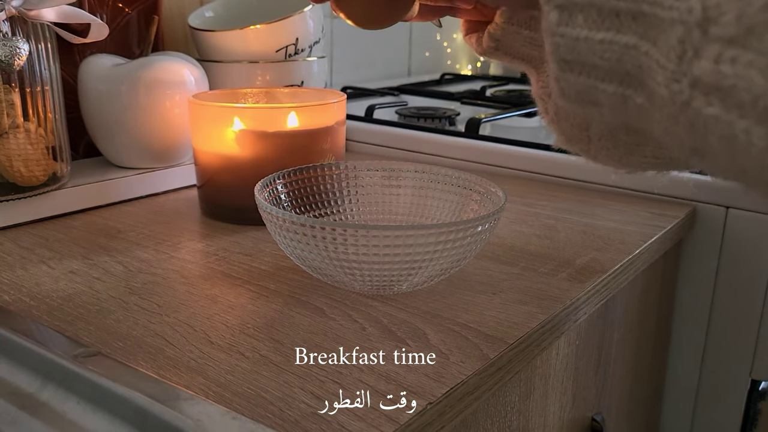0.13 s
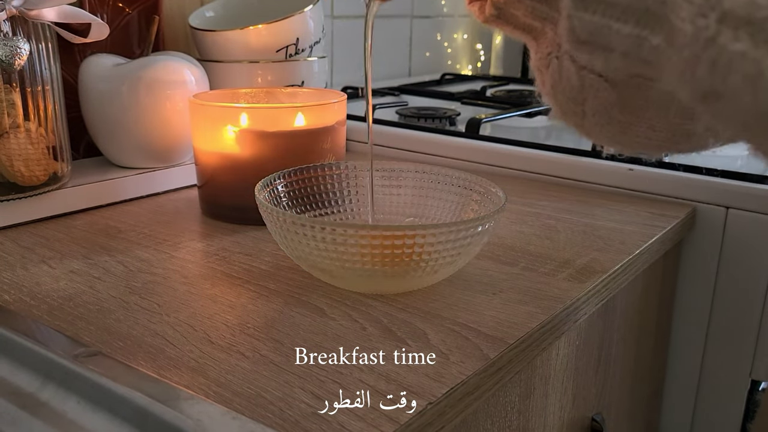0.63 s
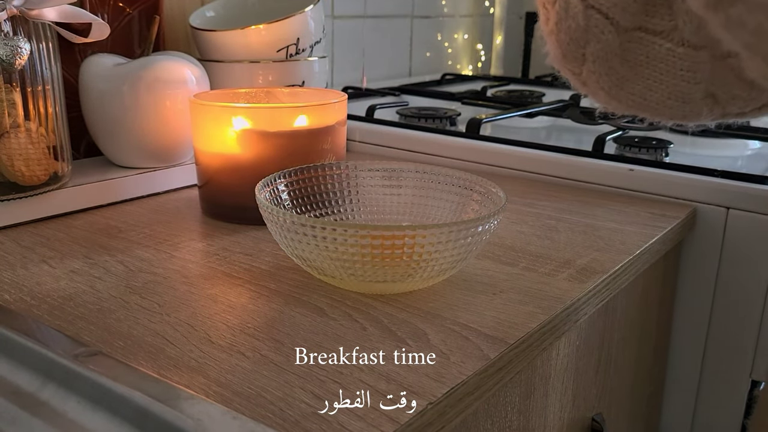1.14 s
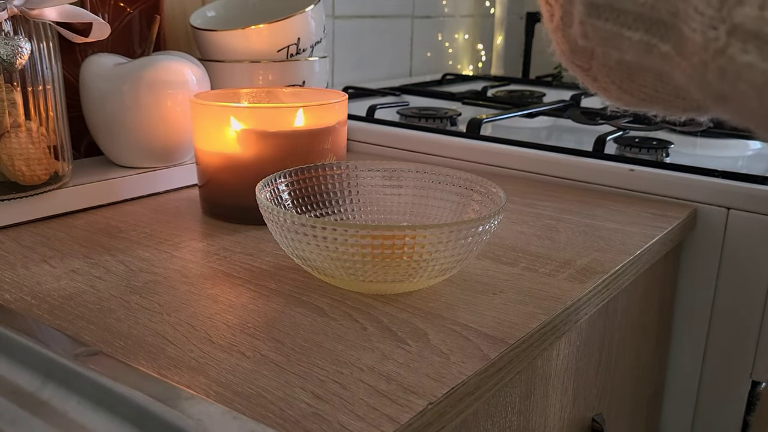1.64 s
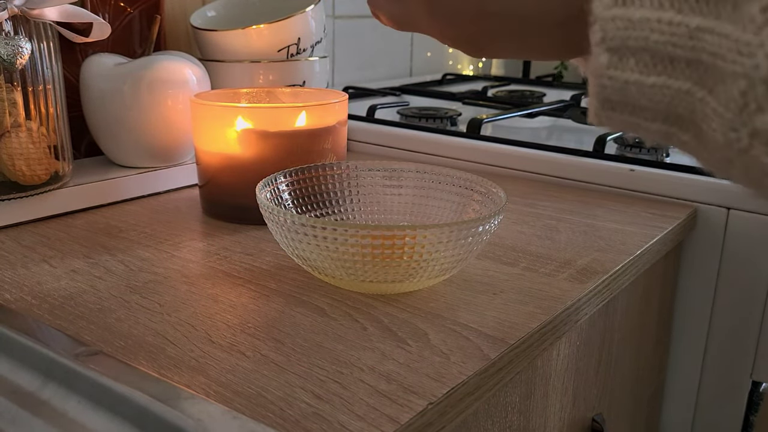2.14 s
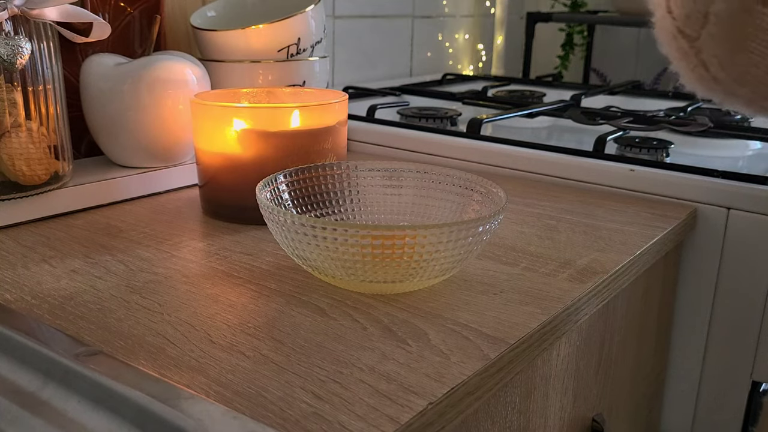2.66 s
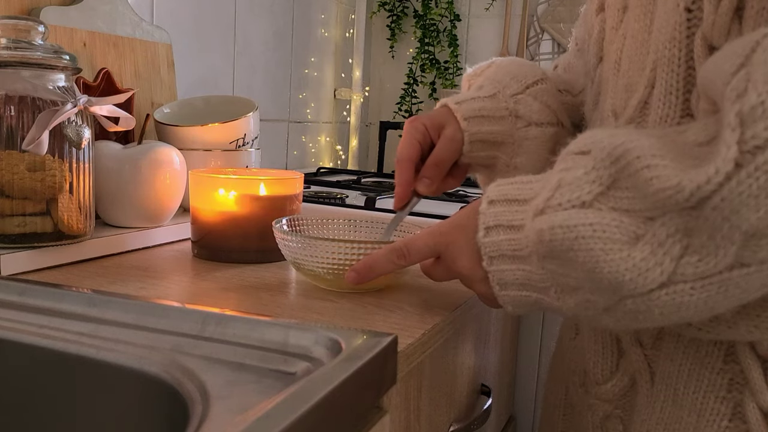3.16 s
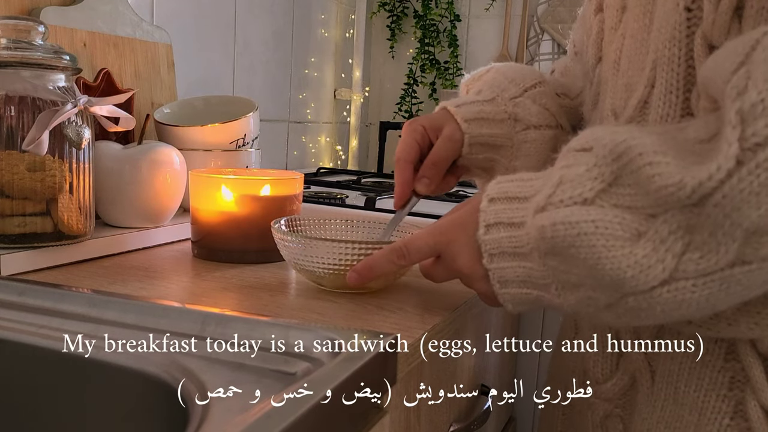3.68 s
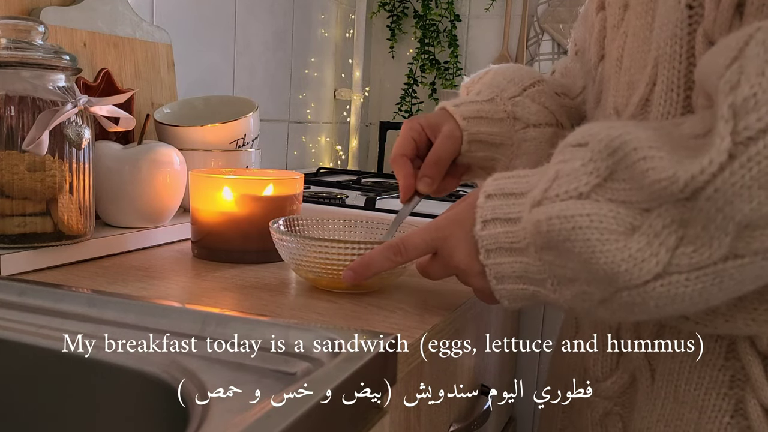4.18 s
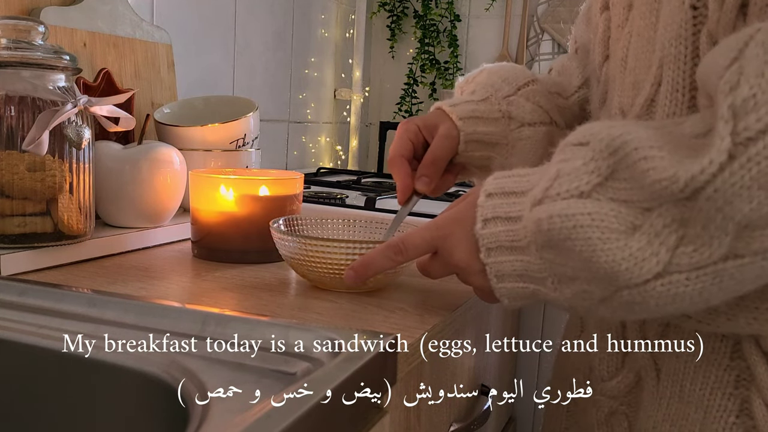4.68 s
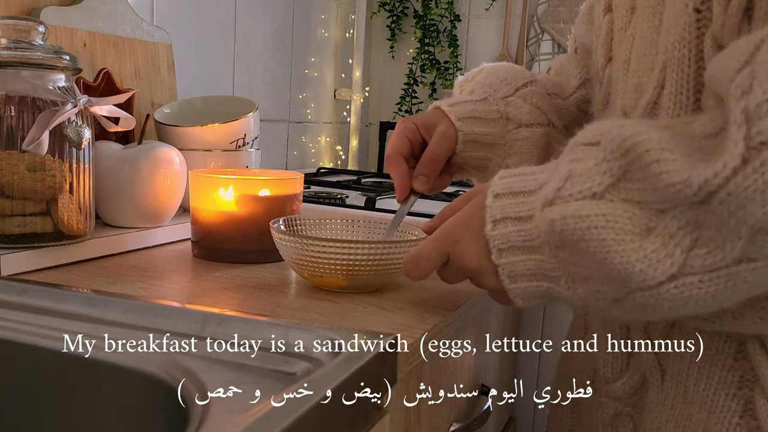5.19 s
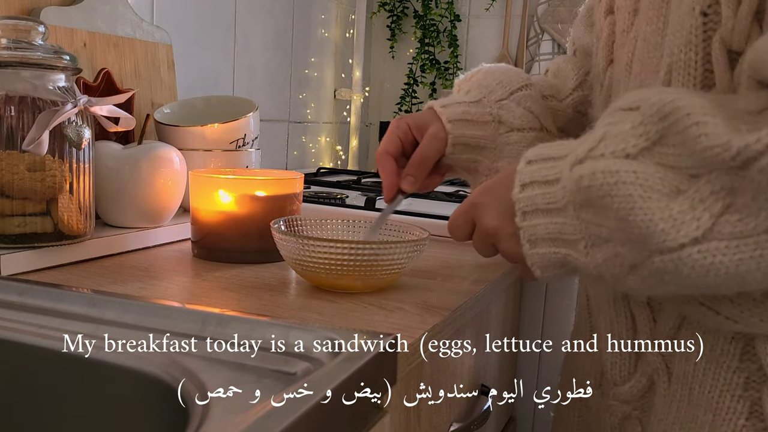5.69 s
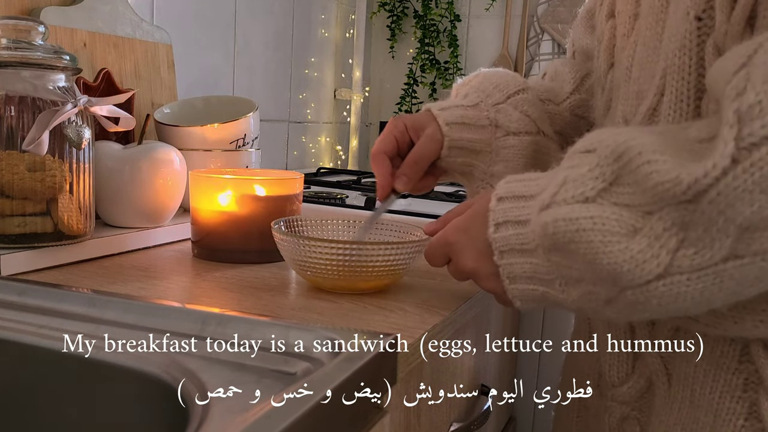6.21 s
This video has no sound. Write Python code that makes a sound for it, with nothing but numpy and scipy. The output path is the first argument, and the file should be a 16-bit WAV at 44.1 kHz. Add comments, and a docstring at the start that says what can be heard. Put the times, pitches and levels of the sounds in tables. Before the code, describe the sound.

An egg cracks and its shell crunches softly in a quiet kitchen, then a fork beats briskly in a glass bowl with bright clinks and thumps.

```python
"""Egg beaten in a glass bowl

A quiet kitchen, close microphones: an egg is cracked over a glass bowl and its shell crunched in the hands
(splinter bursts through resonances), birds far outside (husky pitch glides) over a hush of shaped noise.
Then, louder, a fork beats the egg: tines chatter on the glass (decaying modes and noise snaps), the bowl
thumps the hollow worktop (swings and resonances), the egg slops (band noise), the small tiled room answers."""
import sys
import numpy as np
from scipy import signal
from scipy.fft import rfft, irfft
from scipy.io import wavfile

SR = 44100
rng = np.random.default_rng(int(sys.argv[2]) if len(sys.argv) > 2 else 0)


def ratio(d):
    """dB to gain"""
    e = np.asarray(d, float) / 20
    return 10 ** e


def unload_audio(sound):
    """Save the sound as a 16-bit wav file, at the path given as the first command line argument."""
    columns = np.transpose(np.atleast_2d(sound))
    # keep every value between -1 and 1, then stretch to whole-number steps
    steps = np.round(np.clip(columns, -1, 1) * 32767)
    wavfile.write(sys.argv[1], SR, steps.astype(np.int16))


N = 279153
T = np.arange(N) / SR

# Room tone. Each row: frequency in Hz, relative density in dB per Hz.
HUSH_SPECTRUM = [(15, -38), (25, -6), (63, -1), (134, -18.5), (175, -17), (242, -21.5), (373, -25),
                 (416, -27.5), (818, -30.5), (1610, -38), (4250, -28.5), (6560, -46), (16000, -47.5)]
HUSH_DB = -67
# Far birds. Each row: start in seconds, length in seconds, first pitch in Hz, last pitch in Hz, level in dB.
CHIRPS = [(0.145, 0.042, 3900, 2960, -64), (1.548, 0.04, 4970, 7500, -74), (1.553, 0.065, 4550, 3900, -63),
          (1.705, 0.069, 4440, 4110, -62.5), (1.852, 0.075, 4570, 3900, -60),
          (2.248, 0.075, 4480, 3900, -64), (2.301, 0.042, 3600, 3160, -69.5),
          (2.369, 0.047, 4310, 3660, -73), (2.559, 0.051, 4250, 3670, -81)]
# Decay of the small room. Each row: frequency in Hz, t60 in seconds.
ROOM_T60 = [(100, 0.86), (500, 0.24), (2000, 0.39), (8000, 0.18), (16000, 0.29)]
ROOM_DB, FIRST_ECHO_S = -2.5, 0.0017

# Eggshell cracks, and among them small glass tinks ringing near 8.3 kHz. Each row: start in seconds, level in
# dB, ringing pitch in Hz, t60 in seconds, broad snap in dB over the ringing.
CRACKS = [(.166,-51,3160,0.085,1),(0.297,-33,2527,0.071,-22),(0.2966,-29,2594,0.029,5.5),(0.5052,-44,1800,0.034,9.5),(.513,-42,14500,0.0083,4),
          (0.52,-43.5,1410,0.0089,6),(0.604,-53,8340,0.023,-5),(.6075,-48,3460,0.012,-2.5),(.7264,-68,7450,.015,7),(0.7736,-48,1830,.016,0),
          (.7781,-44.5,3800,0.014,3.5),(1.077,-47,8380,0.027,-34),(1.3354,-57,9360,0.019,-21),(1.3848,-58,2770,0.016,-8),
          (1.4715,-50,1870,.042,-9),(1.6217,-46.5,1910,0.058,-9),(1.6419,-38.5,2017,0.045,-9),(1.75,-63,2090,.015,-3),
          (1.7862,-48,2030,0.05,-4),(1.8328,-40.5,2094,0.06,-9),(1.9824,-61,2100,.015,-2),(2.003,-41.5,1800,0.011,3),
          (2.1188,-48.5,1560,0.017,10.5)]
# Shell halves ground together. Each row: start in seconds, hold in seconds, level in dB, hollow pitch in Hz.
GRINDS = [(1.471,0.035,-74.5,1747),(1.62,0.017,-66,1940),(1.663,0.016,-59,1980),(1.821,0.015,-57.5,2030),
          (1.918,0.019,-64.5,1914),(1.978,0.082,-48.5,1880)]
# Resonances of grinding shell. Each row: centre in Hz, width in Hz, relative level in dB.
SHELL_BODY = [(3100, 1100, -3.5), (5580, 250, -11.5), (7700, 1200, -19), (1170, 440, -19.5)]
GRIND_RISE_S, GRIND_FALL_DB_S, SAG_HZ_PER_S, CRISP_DB = 0.0041, 363, 1000, -8
SHELL_LEFT_DB = 0.5  # left minus right

# Strokes through the egg. Each row: start in seconds, egg level in dB, tine drag level in dB,
# strength of the cupboard rattle in dB.
STROKES = [(2.883,-49.5,-55,-37),(2.93,-49,-69,-41),(3.031,-61,-48.5,-41),(3.21,-59.5,-74,-43),(3.37,-51.5,-55,-37.5),
           (3.541,-55,-62,-38.5),(3.717,-54.5,-78,-37),(3.871,-51,-57,-36.5),(4.038,-54,-58,-38),(4.204,-51,-48.5,-40.5),
           (4.366,-51,-60,-39),(4.522,-47,-48,-38.5),(4.703,-51.5,-52.5,-43),(4.866,-60,-68,-40),(5.04,-57,-58,-38.5),
           (5.24,-60,-59,-45.5),(5.398,-42,-53.5,-36.5),(5.575,-49,-58,-38.5),(5.76,-49,-56,-37),(5.928,-51.5,-52,-41.5),
           (6.125,-50,-57,-39.5),(6.282,-64,-52,-38.5)]
EGG_RISE_S, EGG_FALL_DB_S = 0.03, 232
DRAG_RISE_S, DRAG_FALL_DB_S = 0.019, 330

# Bowl pressed on the worktop. Each row: start in seconds, swing level in dB, rocking rate in Hz,
# length in seconds, deep board mode in dB over the swing.
THUMPS = [(0.583,-40.5,62.3,0.035,-31),(0.64,-50.5,61,0.083,-11),(2.884,-35,80.3,.056,-1),(2.917,-29,95.7,0.066,-24),(3.028,-29,86,0.074,-6),
          (3.215,-31.5,90,0.056,-0.5),(3.372,-25,89,0.051,-2.5),(3.541,-26,83.5,0.048,-23),(3.718,-28,88.3,.044,-22),
          (3.871,-26,85,0.067,-2.5),(4.04,-25.5,83.4,0.056,-17),(4.101,-41,91,0.08,-18),(4.206,-25,93,.057,-12),
          (4.284,-33,83.4,0.06,-20),(4.363,-27.5,97.5,0.075,-7),(4.43,-37,95,0.052,-0.5),(4.523,-24.5,85.8,0.082,-7),
          (4.614,-35,85.7,0.041,-35),(4.712,-24.5,87,0.044,-35),(4.774,-36,90,0.038,-25),(4.866,-26.5,89.9,0.063,-6),
          (4.932,-38,76,0.02,-18),(5.042,-26.5,86.2,0.066,-4.5),(5.198,-33.5,90,0.041,-9),(5.237,-37,87,0.063,-10),
          (5.389,-29.5,91,0.06,-9),(5.565,-36,83.4,0.052,-16),(5.628,-30,88.6,.048,-4),(5.761,-33.5,89,0.069,-2.5),
          (5.926,-28.5,85,0.08,-4.5),(6.132,-33,70.4,0.026,-4),(6.289,-24,87.2,0.14,2)]
BOARD_HZ, BOARD_T60_S, DEEP_HZ = 81.23, 0.88, 71.8
# Cupboard under the worktop. Each row: mode in Hz, gain in dB, t60 in seconds.
CUPBOARD = [(208, -7, 0.16), (263.2, -3, 0.26), (351.8, 12, 0.048), (404.4, 7.5, 0.097), (437, -19, 0.092),
            (489, -35, 0.47), (623, -74, 0.082)]

# Fork on glass. Each row: start in seconds, level in dB, then in dB how hard the rim, ping and
# upper families of modes are struck.
CLINKS = [(2.8822,-29.5,-4.5,-10,-4),(3.0274,-22.5,-12,-5,-5),(3.2068,-24.5,-13,0,-2),(3.3673,-18.5,-9,7,-1),
          (3.5415,-20.5,-8.5,-4,-6),(3.692,-52,-10,9,-20),(3.715,-22,-7,-7,-6.5),(3.8702,-20,-7,-1.5,-6),
          (4.0357,-22.5,-2.5,-3,0),(4.203,-24,-5.5,-5.5,-3.5),(4.3641,-20.5,-9,-6,1.5),(4.5227,-20,-8.5,-1.5,-1.5),
          (4.6972,-30.5,-6,-0.5,-11),(4.7178,-32,-14,-12,-1.5),(4.8507,-40.5,6,4,-2),(4.8667,-20,-1.5,-19,-2),
          (4.8962,-40,-28,-8,-18),(5.037,-22,-9,4,-3.5),(5.157,-51,-1,-13,-8),(5.2424,-42.5,5.5,-16,-4),(5.3764,-50,18,11,-15),
          (5.398,-21.5,-4,2,2.5),(5.5487,-45.5,4,4,-21),(5.5752,-22,-6.5,-8,-0.5),(5.7575,-25.5,-13,-3.5,-2),
          (5.9256,-22,-14,-10,3.5),(6.1,-46.5,16,-15,-12),(6.1164,-26,-10.5,-8,-4),(6.2698,-42,11,3,2),(6.284,-23,-17.5,-2.5,-11)]
# Bounds in Hz of the ten families of bowl modes, low to high.
FAMILY_EDGES = (1250, 1750, 2650, 3100, 3500, 4500, 5300, 7200, 9100, 11700, 15900)
# Held bowl and fork. Each row: mode in Hz, relative level in dB, t60 in seconds.
BOWL = [(1409, -1, 0.019), (1502, -12, 0.067), (1635, -2.5, 0.012), (2150, -17, 0.11), (2330, -11.5, 0.046),
        (3135, 1, 0.0055), (3272, -12.5, 0.04), (3320, -44, 0.078), (3900, 9.5, 0.005), (4952, 10.5, 0.017),
        (4944, 8, 0.0075), (5460, -28, 0.011), (5850, 20.5, 0.0045), (6530, 13.5, 0.011), (6870, 2, 0.014),
        (7867, 5, 0.013), (8160, 19, 0.0046), (8310, 22.5, 0.0037), (7996, 10, 0.012), (9410, -1.5, 0.012),
        (13500, -14, 0.0067), (13480, 9.5, 0.016), (14300, -36, 0.013), (15400, -41, 0.0064)]
BOWL_LOW_HZ = 1200
SOFT_DB, DULL_DB_PER_DB = -38, 0.5  # blows softer than this lose their top
WALL_DB, HIGH_DB, TOP_DB = -4, -2.5, -4  # families given the same base strength in every blow
# Lowest modes once the hand lets go of the rim. Each row: mode in Hz, gain in dB, t60 in seconds.
FREE_BOWL = [(906, -43.5, 0.96), (2193, -37.5, 0.64)]
LET_GO_S = 5.22

# Balance of the microphone pair. Each row: frequency in Hz, left minus right in dB.
LEFT_BALANCE = [(60, 3.0), (110, 3.0), (200, 1.0), (380, 1.0), (700, 2.0), (1290, 4.0), (2380, 4.0),
                (4400, 1.5), (8120, 1.0), (15000, 1.0)]
LEFT_LEAD_S, LEAD_TOP_HZ = 5e-5, 5000  # above this the phase gap between the ports stops growing
MIC_LOW_HZ = 57.3


def across(table, hz):
    """Read (Hz, value) points on a log-frequency axis."""
    f, v = np.transpose(table)
    return np.interp(np.log(np.maximum(hz, 1)), np.log(f), v)


def ring(x, hz, t60):
    """One mode as a complex one-pole resonator: a unit tap rings with unit amplitude."""
    pole = np.exp((2j * np.pi * hz - np.log(1000) / max(t60, .002)) / SR)
    return signal.lfilter([1], [1, -pole], x).imag


def band(x, lo_hz, hi_hz):
    """Band-pass."""
    sos = signal.butter(2, [lo_hz, min(hi_hz, .45 * SR)], "band", fs=SR, output="sos")
    return signal.sosfilt(sos, x)


def add(track, s, burst):
    """Mix a burst in at time s."""
    i = int(s * SR)
    track[i:i + len(burst)] += burst[:N - i]


def splinters(n, spread_db, most):
    """Noise whose samples have uneven sizes."""
    return rng.standard_normal(n) * ratio(spread_db * np.minimum(rng.exponential(size=n), most))


def grains(spread_db):
    """Uneven noise for the whole scene; rms 1."""
    g = splinters(N, spread_db, 6)
    return g / g.std()


def swells(starts, level_db, rise_s, fall_db_s, held_s=0):
    """Gain that rises at each start, holds, then falls evenly in dB."""
    out, t = np.zeros(N), T[:int(.3 * SR)]
    for s, db, held in np.broadcast(starts, level_db, held_s):
        fall_db = fall_db_s * np.maximum(t - rise_s - held, 0)
        add(out, s, np.clip(t / rise_s, 0, 1) ** 2 * ratio(db - fall_db))
    return out


def hush():
    """Room tone: shaped noise, more alike left and right in the bass."""
    hz = np.arange(N // 2 + 1) * SR / N
    mid, side = rfft(rng.standard_normal((2, N))) * ratio(across(HUSH_SPECTRUM, hz))
    air = irfft(mid + np.clip(hz / 900, .15, 1) * side * np.array([[1], [-1]]), N)
    return air / air.mean(axis=0).std() * ratio(HUSH_DB)


def birds():
    """Short whistles, mostly falling, made husky by noise on their loudness."""
    out = np.zeros(N)
    husk = band(rng.standard_normal(N), 49, 300)
    for s, length, from_hz, to_hz, db in CHIRPS:
        n = int(length * SR)
        phase = 2 * np.pi * np.cumsum(np.linspace(from_hz, to_hz, n)) / SR
        add(out, s, ratio(db) * np.hanning(n) ** .5 * np.sin(phase))
    return out * (1 + 0.53 * husk / husk.std())


def room(x, alike_hz=350):
    """Dense echoes with a decay set band by band; both microphones share more of the bass."""
    n = int(.6 * SR)
    onset = np.clip(T[:n] / FIRST_ECHO_S - 1, 0, 1)
    tail = 0
    for hz in 150 * 2. ** np.arange(0, 7, .5):  # half-octave steps
        mid, side = rng.standard_normal((2, n))
        pair = mid + min(hz / alike_hz, 1) * side * np.array([[1], [-1]])
        decay = ratio(-60 * T[:n] / across(ROOM_T60, 0.89 * hz))
        part = band(pair, hz, 1.54 * hz) * decay * onset
        # energy in proportion to bandwidth
        tail = tail + part * np.sqrt(hz / SR / np.sum(part ** 2, axis=1, keepdims=True))
    return signal.fftconvolve(x, tail, axes=1)[:, :N]


def shell_cracks():
    """Each crack is a short burst of splinters ringing the hollow shell; the small glass tinks are made the
    same way, high up."""
    out, n = np.zeros(N), int(.12 * SR)
    for s, db, hz, t60, snap_db in CRACKS:
        splinter_s = 0.011 * ratio(0.67 * (db + 30))  # big cracks splinter longer
        burst = splinters(n, 5.2, 3) * np.exp(-T[:n] / splinter_s)
        snap = band(burst, min(1.35 * hz, 5000), 9900)
        tone = sum(ring(burst, hz + k * 130, t60) for k in (-1, 0, 1))  # a broken shell rings in a cluster
        add(out, s, ratio(db) * (tone / np.abs(tone).max() + ratio(snap_db) * snap / np.abs(snap).max()))
    return out


def shell_grinding():
    """A dense run of splinters; the hollow between the halves sinks in pitch as they part."""
    s, held, db, hz = np.transpose(GRINDS)
    latest = np.maximum(np.searchsorted(s, T) - 1, 0)
    hollow_hz = hz[latest] - SAG_HZ_PER_S * np.clip(T - s[latest], 0, .3)
    grit = grains(4.5)
    hollow = band(grains(7.2), 38, 190) * np.sin(2 * np.pi * np.cumsum(hollow_hz) / SR)
    body = sum(ratio(g) * band(grit, centre - w / 2, centre + w / 2) / np.sqrt(2 * w / SR)
               for centre, w, g in SHELL_BODY)
    crisp = band(grit, 5000, 11000)
    texture = hollow / hollow.std() + body + ratio(CRISP_DB) * crisp / crisp.std()
    return swells(s, db, GRIND_RISE_S, GRIND_FALL_DB_S, held) * texture


def shell():
    """Cracks and grinding without low body, a touch stronger on the left."""
    return band(shell_cracks() + shell_grinding(), 800, 20000) * ratio(SHELL_LEFT_DB * np.array([[.5], [-.5]]))


def slop():
    """Wet lumpy noise of egg folding over, and the tines dragging on the ribbed glass."""
    s, egg_db, drag_db, _ = np.transpose(STROKES)
    wet = band(band(grains(7.0), 370, 834), 370, 834)
    grit = grains(6.3)
    # the drag excites only the lower bowl modes, ringing longer than under a blow
    drag = sum(ratio(db) * ring(grit, hz, 3.1 * t60) for hz, db, t60 in BOWL if hz < FAMILY_EDGES[2])
    return (swells(s, egg_db, EGG_RISE_S, EGG_FALL_DB_S) * wet / wet.std()
            + swells(s, drag_db, DRAG_RISE_S, DRAG_FALL_DB_S) * drag / drag.std())


def worktop(tail_db=-6):
    """The bowl rocks on its foot for a few swings; board and cupboard modes boom along."""
    rock, rattle = np.zeros((2, N))
    for s, db, hz, length, deep_db in THUMPS:
        t = T[:int(length * SR)]
        press = np.sin(np.pi * t / length) ** 0.77
        swing = np.sin(2 * np.pi * hz * t)
        deep = ratio(deep_db) * np.sin(2 * np.pi * DEEP_HZ * t)
        add(rock, s, ratio(db) * press * (swing + deep))
    t = T[:int(.06 * SR)]
    for s, _, _, db in STROKES:
        add(rattle, s, ratio(db) * np.exp(-t / 0.044) * rng.standard_normal(len(t)) / np.sqrt(len(t)))
    board = ring(rock, BOARD_HZ, BOARD_T60_S) * ratio(tail_db) / (0.023 * SR)
    cupboard = sum(ratio(db) * ring(rattle, hz, t60) for hz, db, t60 in CUPBOARD)
    return rock + board + cupboard


def free_bowl():
    """The unheld bowl hums on from blow to blow: each late clink taps its lowest modes."""
    taps = np.zeros(N)
    for s, db, *_ in CLINKS:
        taps[int(s * SR)] = ratio(db) * (s > LET_GO_S)
    return sum(ratio(db) * ring(taps, hz, t60) for hz, db, t60 in FREE_BOWL)


def fork(chatter_s=0.012, snap_db=11, middle_db=-5, held_db=-15,
         rebound_s=0.028, rebound_db=-10, rim_rebound_db=-2, held_rebound_db=4):
    """The tines land and bounce for a few ms; each blow meets the modes at another spot,
    hand and egg pull them a little off pitch, and the fork springs back for a second touch."""
    scatter_db, detune = 4.5, .015
    n, out = int(.25 * SR), np.zeros(N)
    hz, mode_db, t60 = np.transpose(BOWL)[:, :, None]
    family = np.searchsorted(FAMILY_EDGES, hz) - 1
    second_touch = ratio(np.select([family == 0, family == 1], [rim_rebound_db, held_rebound_db], rebound_db))
    for s, db, rim_db, ping_db, upper_db in CLINKS:
        dull_db = -DULL_DB_PER_DB * max(SOFT_DB - db, 0)
        family_db = np.array([rim_db, held_db, middle_db, ping_db, middle_db, WALL_DB, middle_db, upper_db,
                              HIGH_DB + dull_db, TOP_DB + dull_db])
        late = int(rebound_s * SR * (1 + .12 * rng.uniform(-1, 1)))
        shape = np.clip(1.4 - T[:n] / chatter_s, 0, 1)
        shape[late:] += ratio(rebound_db) * shape[:-late]
        bounces = shape * splinters(n, 10.9, 3)
        bounces = bounces / np.sqrt(np.sum(bounces ** 2))
        spot, pull, phase = rng.standard_normal((3, len(BOWL), 1))
        swing = np.sin(2 * np.pi * hz * (1 + detune * pull) * T[:n] + 2 * phase)
        modes = ratio(mode_db + family_db[family] + scatter_db * spot - 60 * T[:n] / t60) * swing
        modes = modes * np.clip(T[:n] / 0.0024, 0, 1)  # the ring builds while the tines chatter
        modes[:, late:] += second_touch * modes[:, :-late]
        # the countless short modes in between blur into a coloured snap
        snap = sum(ratio(g) * band(bounces, lo, hi)
                   for g, lo, hi in zip(family_db, FAMILY_EDGES, FAMILY_EDGES[1:]))
        blow = modes.sum(axis=0) + ratio(snap_db) * 10 * snap
        add(out, s, ratio(db) * blow / (2 * np.std(blow[:int(.015 * SR)])))
    return band(band(out, BOWL_LOW_HZ, .4 * SR), BOWL_LOW_HZ, .4 * SR)


def scene():
    """All sources reach the left port first; the room answers them and the hush lies beneath."""
    sound = birds() + shell() + slop() + worktop() + free_bowl() + fork()
    hz = np.arange(N // 2 + 1) * SR / N
    side = np.array([[.5], [-.5]])
    lead = np.exp(2j * np.pi * np.minimum(hz, LEAD_TOP_HZ) * LEFT_LEAD_S * (side - .5))
    direct = irfft(rfft(sound) * lead, N)
    mix = direct + ratio(ROOM_DB) * room(sound) + hush()
    return irfft(rfft(mix) * ratio(side * across(LEFT_BALANCE, hz)), N)


def low_pass(x):
    """Removes everything above the highest recorded frequency."""
    return signal.sosfilt(signal.butter(12, 17020, fs=SR, output="sos"), x)


def record(dry):
    """Small microphones lose the deepest bass."""
    mic = signal.sosfilt(signal.butter(2, MIC_LOW_HZ, "high", fs=SR, output="sos"), dry)
    return low_pass(mic)


dry = scene()
out = record(dry)
unload_audio(out)
```